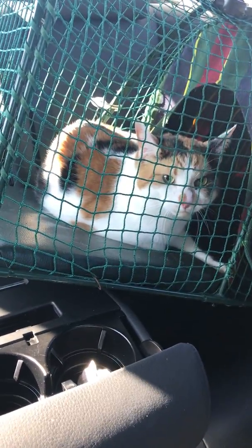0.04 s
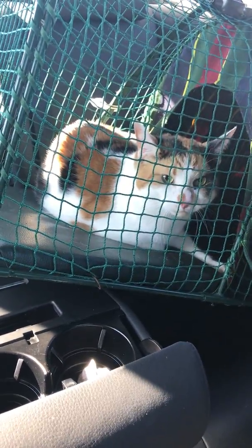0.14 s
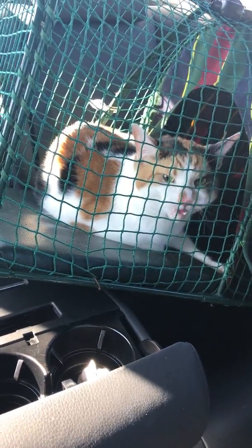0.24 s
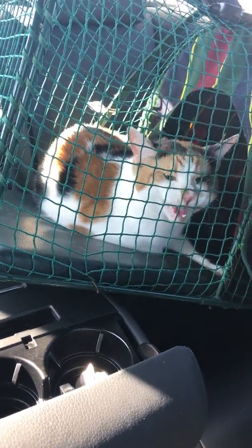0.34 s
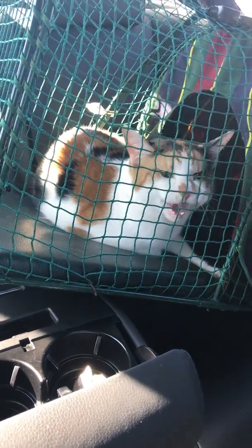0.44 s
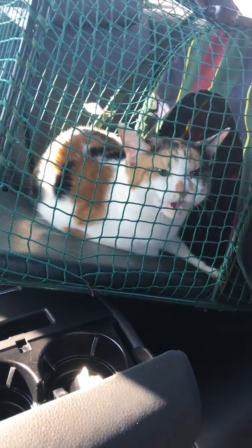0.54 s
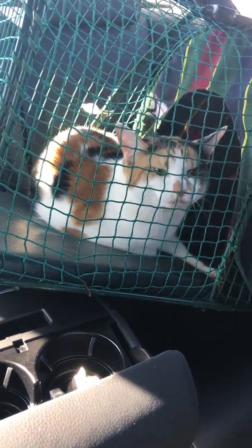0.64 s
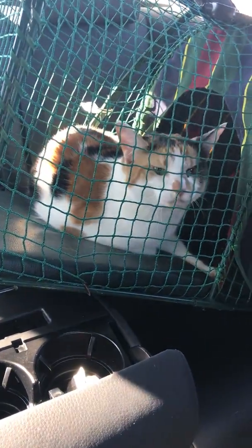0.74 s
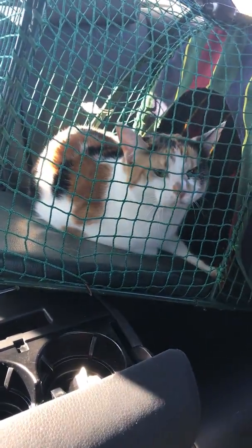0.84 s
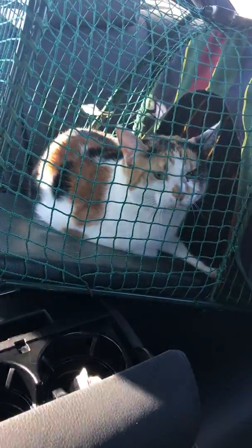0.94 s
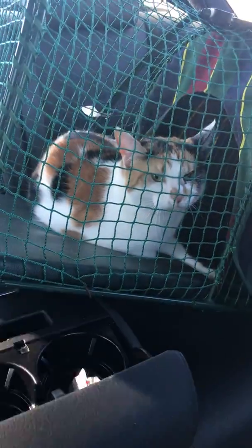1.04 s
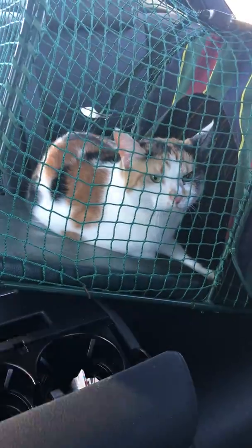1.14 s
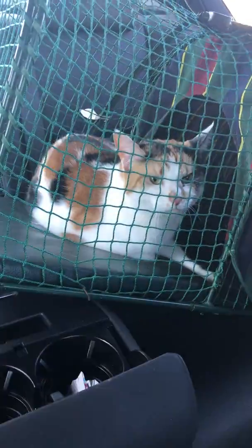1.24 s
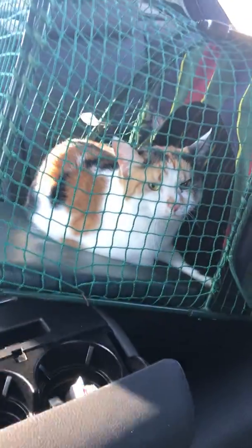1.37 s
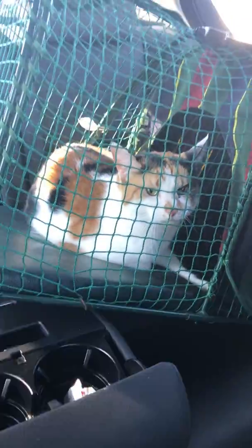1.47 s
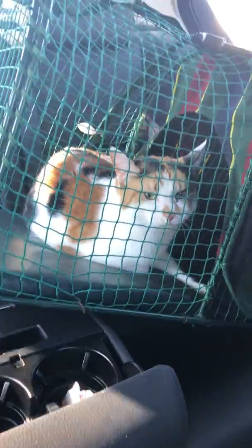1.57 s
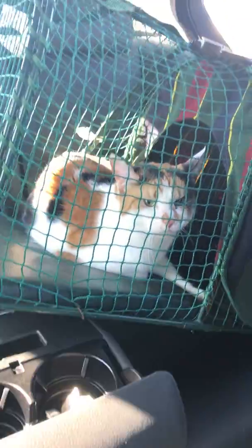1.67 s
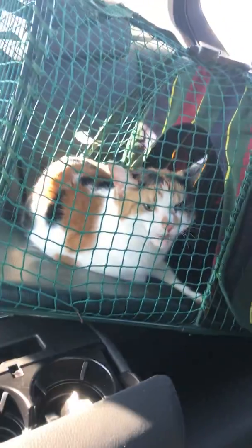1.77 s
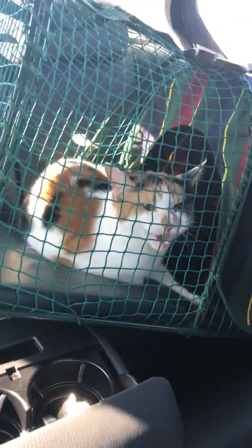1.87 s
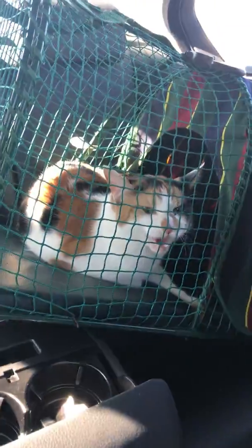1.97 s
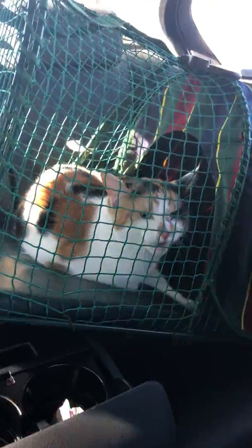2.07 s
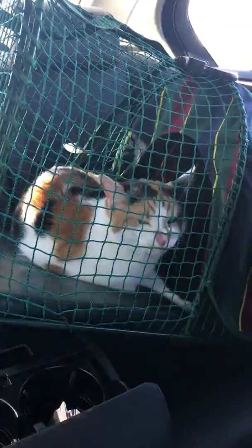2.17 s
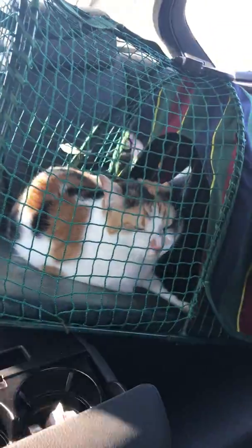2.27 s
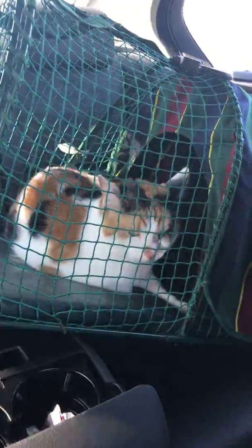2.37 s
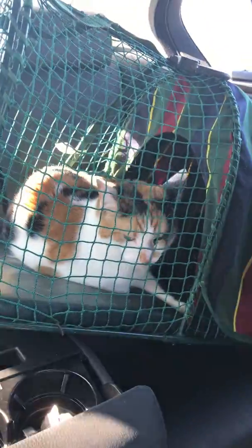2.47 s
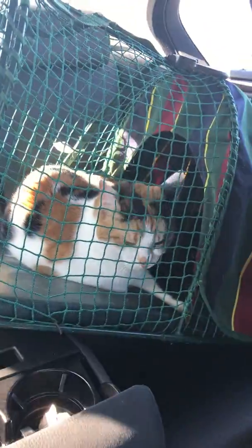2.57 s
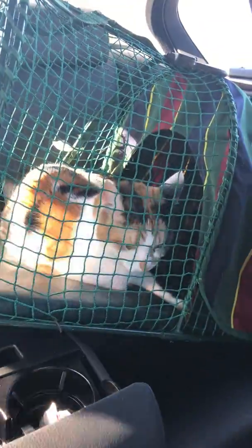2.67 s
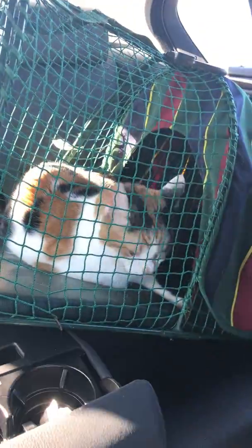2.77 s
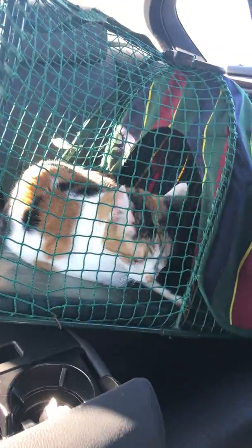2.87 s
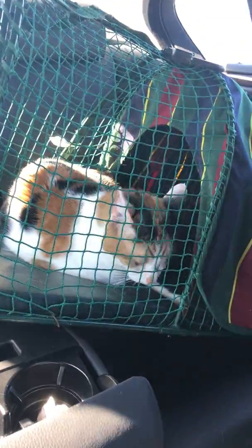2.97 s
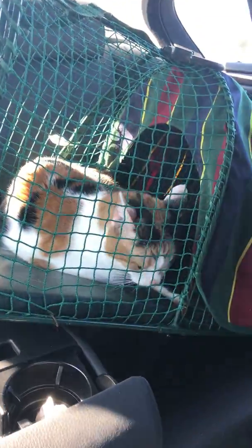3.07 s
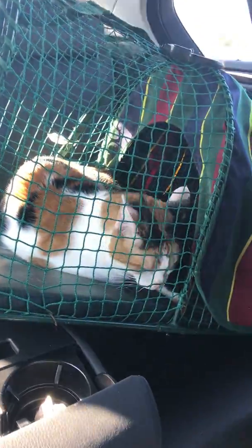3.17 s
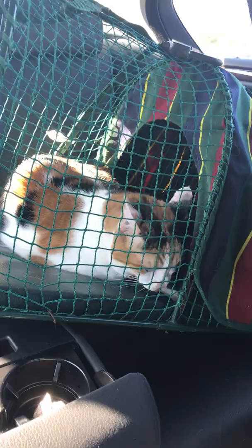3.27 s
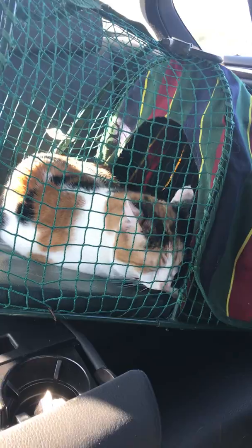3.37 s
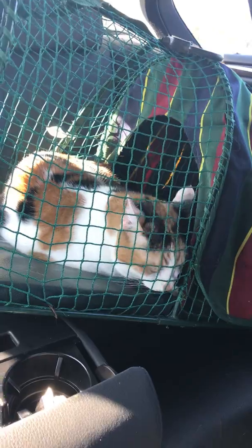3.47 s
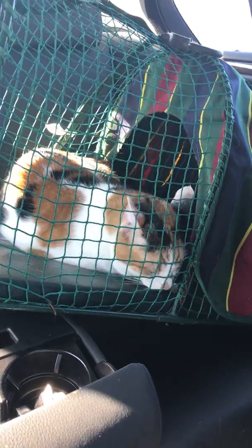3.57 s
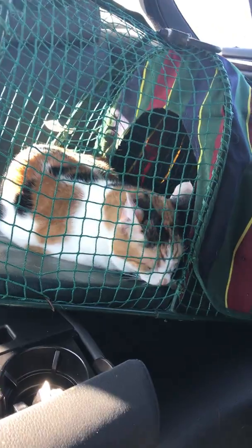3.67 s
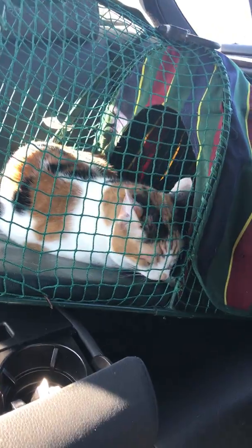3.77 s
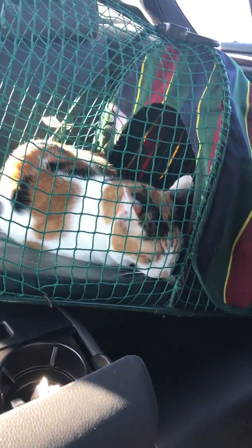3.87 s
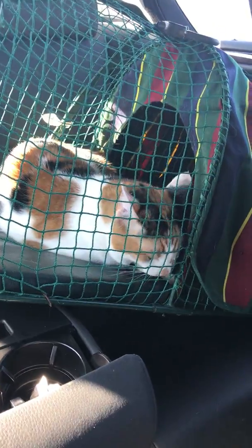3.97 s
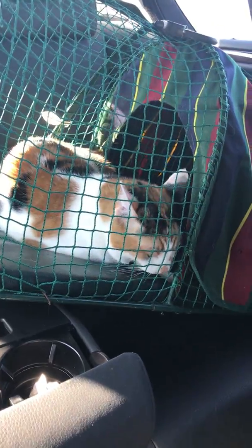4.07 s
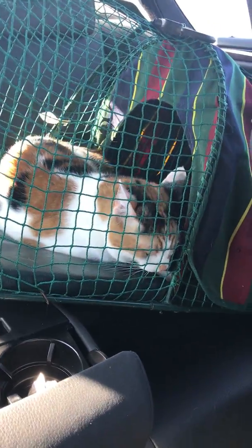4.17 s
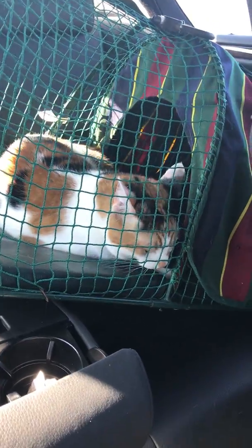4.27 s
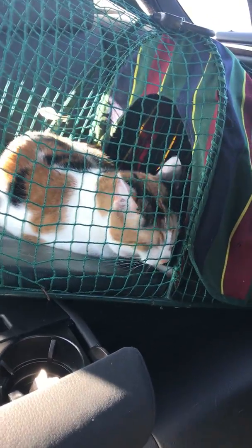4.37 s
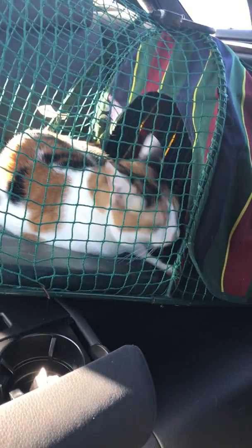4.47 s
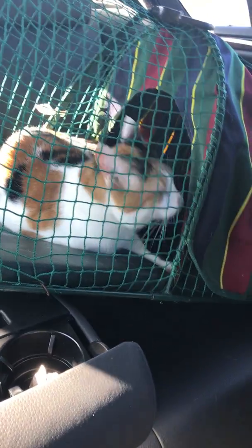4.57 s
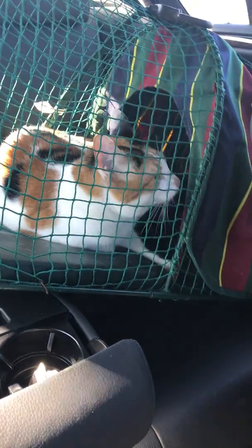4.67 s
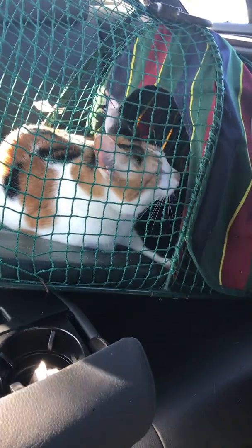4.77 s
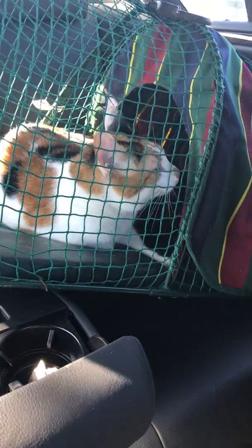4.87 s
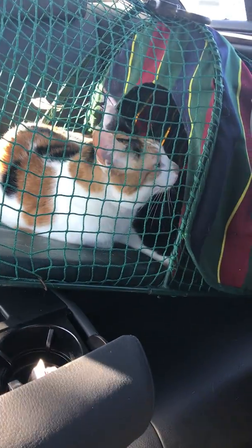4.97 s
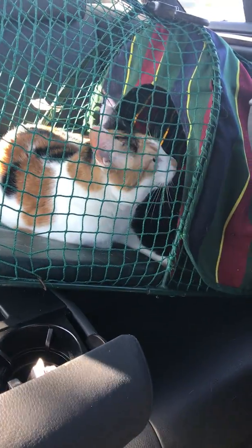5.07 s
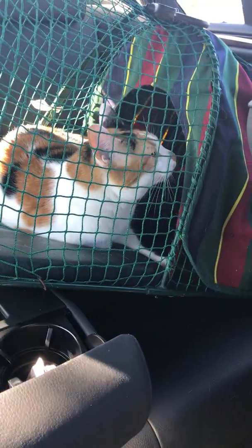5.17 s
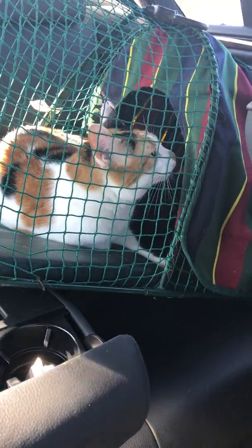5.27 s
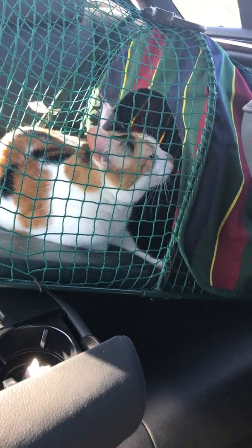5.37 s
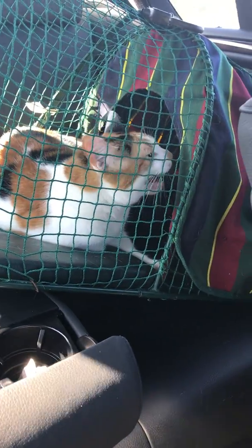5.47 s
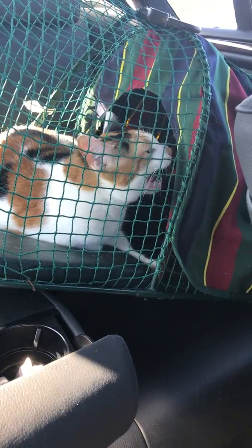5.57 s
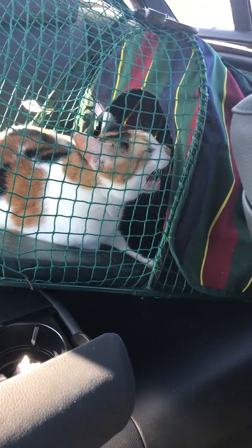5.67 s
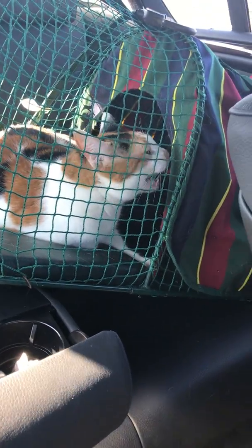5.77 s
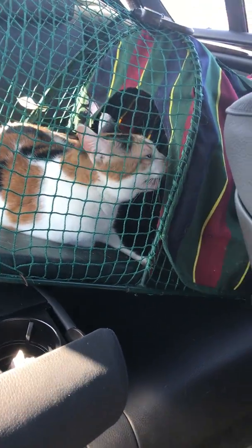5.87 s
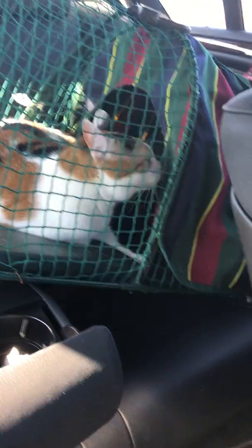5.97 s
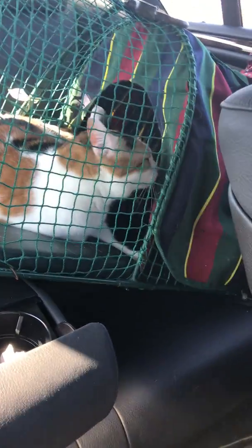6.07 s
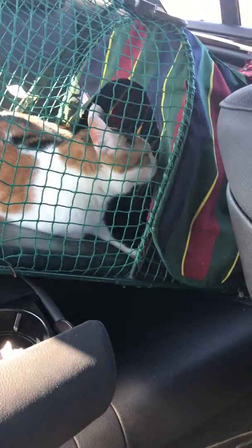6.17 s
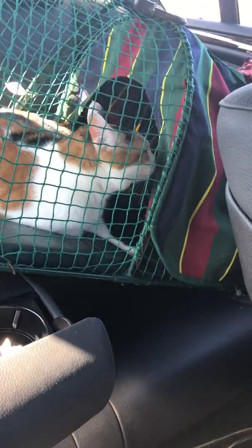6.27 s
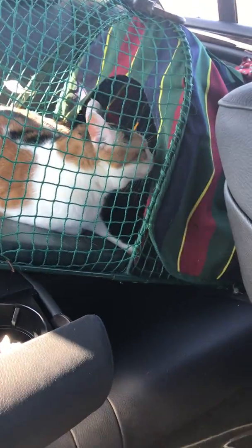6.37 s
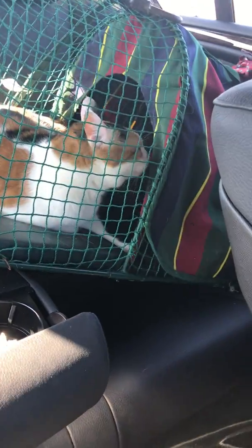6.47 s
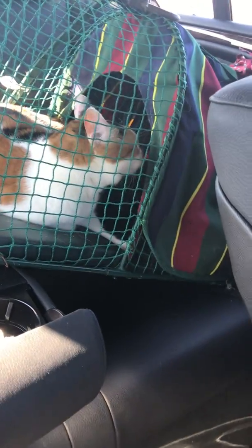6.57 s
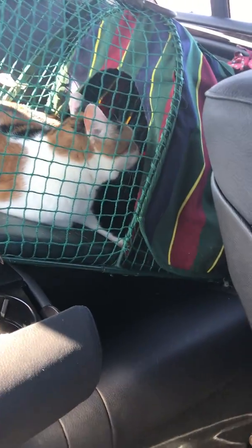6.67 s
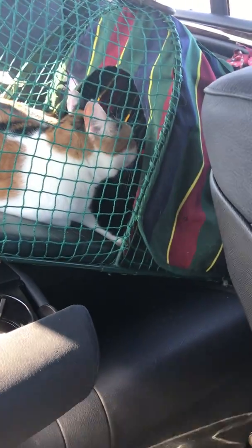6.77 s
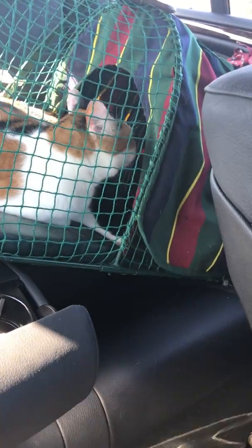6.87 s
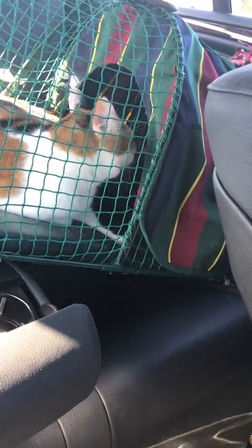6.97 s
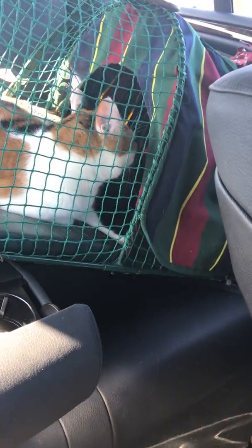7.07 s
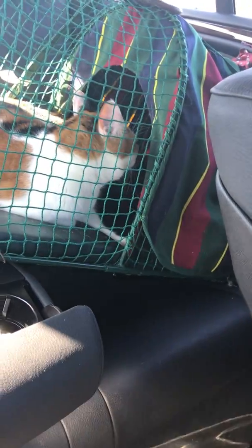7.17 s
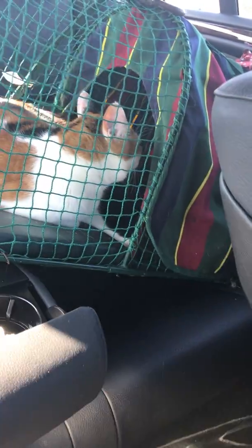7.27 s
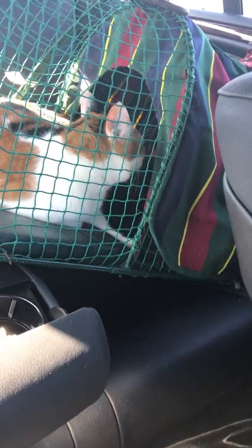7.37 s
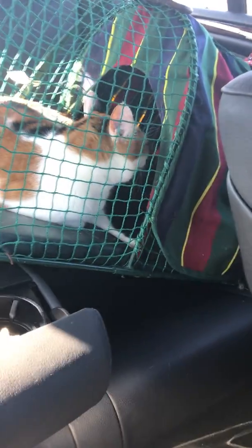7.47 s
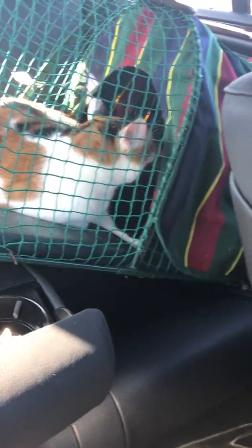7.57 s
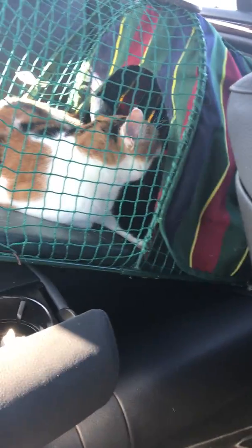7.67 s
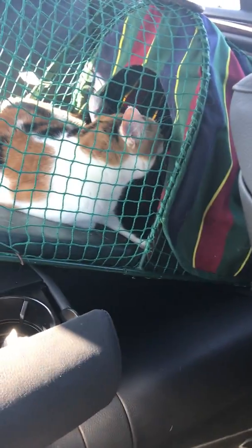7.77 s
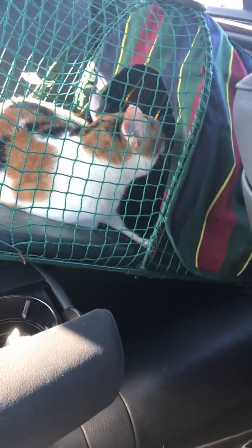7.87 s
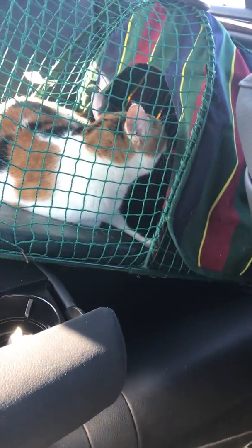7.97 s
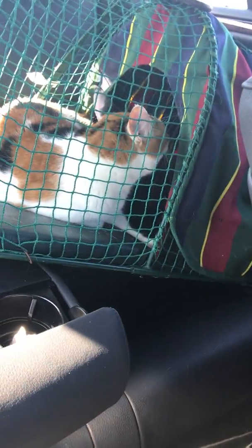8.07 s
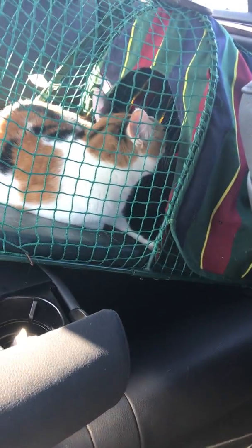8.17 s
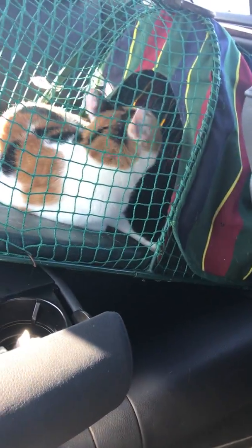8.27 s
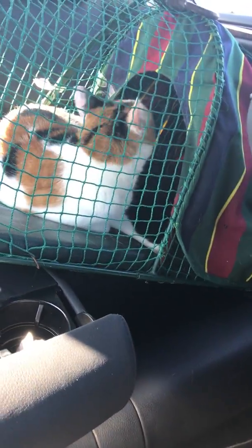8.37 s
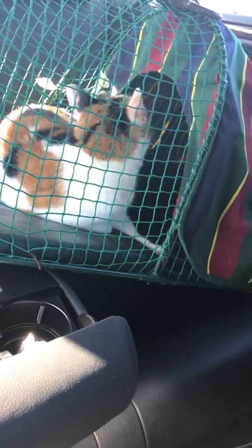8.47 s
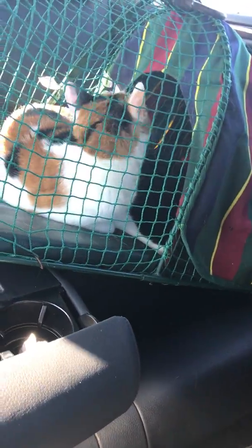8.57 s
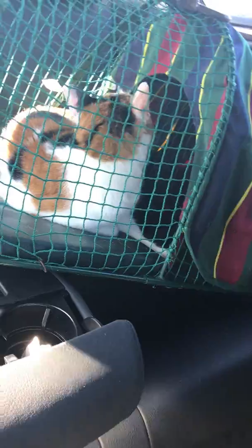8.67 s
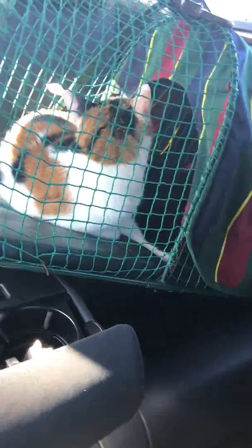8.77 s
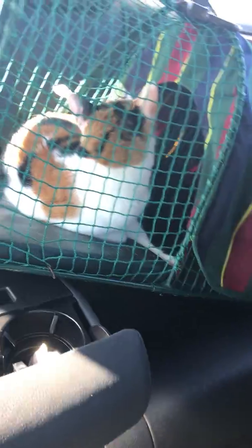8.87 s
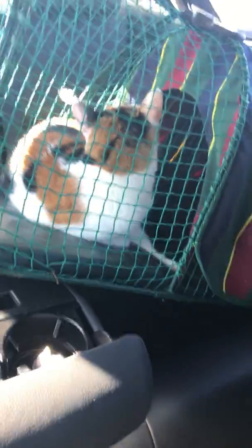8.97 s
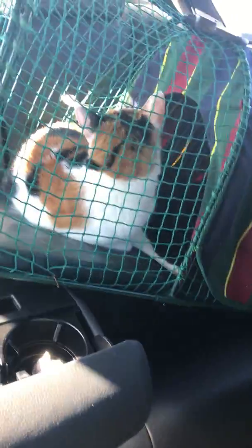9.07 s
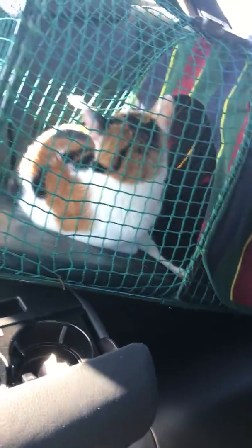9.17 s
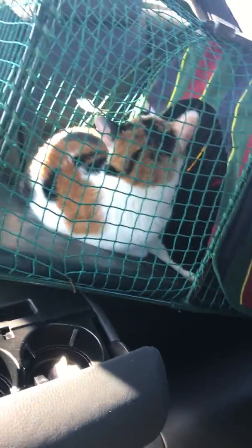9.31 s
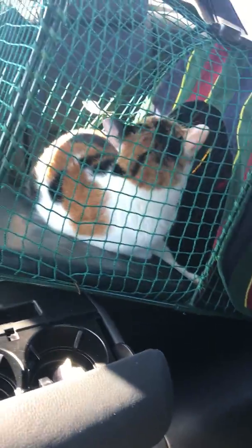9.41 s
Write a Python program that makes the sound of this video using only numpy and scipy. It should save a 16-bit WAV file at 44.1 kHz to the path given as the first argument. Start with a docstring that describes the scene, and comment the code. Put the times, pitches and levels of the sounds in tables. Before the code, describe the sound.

A cat close by meows five times, raspy at first then closing to a hum, over the steady low rumble of a moving car.

```python
"""Cat in a moving car

Inside a small padded cabin, a cat close by in a net carrier meows five times and mews briefly three times.
Each meow starts in a rasp, clears into a tone and ends as a hum: a buzz through three moving formants.
Shaped noise makes the road rumble, tyre roar and air all around, the carrier's ticks and its rustles;
decaying low tones make the road jolts, a sine the late faint whine, and a noise tail the cabin's answer."""
import sys
import numpy as np
from scipy import signal
from scipy.fft import rfft, irfft, next_fast_len
from scipy.io import wavfile
from scipy.ndimage import map_coordinates

SR = 44100
rng = np.random.default_rng(int(sys.argv[2]) if len(sys.argv) > 2 else 0)


def unload_wav(signal):
    """Save mono or channel-first audio to the path in sys.argv[1] as 16-bit WAV at rate SR, clipped to [-1, 1]."""
    wavfile.write(
        sys.argv[1],
        SR,
        np.round(np.clip(np.atleast_2d(signal).T, -1, 1) * 32767).astype(np.int16),
    )


N = 416290


def amp(db):
    """Decibels to gain."""
    return 10 ** (np.asarray(db) / 20)


def unit(x):
    """Scaled to rms 1."""
    return x / np.sqrt(np.mean(x ** 2) + 1e-20)


def along(points, hz):
    """Read (freq_hz, value) points on a log frequency axis."""
    f, v = np.transpose(points)
    return np.interp(np.log(hz + 1), np.log(f + 1), v)


def curves(rows, t):
    """Read each column after the time, at the times t."""
    s, *cols = np.transpose(rows)
    return [np.interp(t, s, c) for c in cols]


def bell(t, centre, half):
    """A smooth bump of height 1."""
    return np.exp(-((t - centre) / half) ** 2)


def wobble(rate, size):
    """A smooth random curve, rate knots a second."""
    knots = rng.standard_normal(int(size * rate / SR) + 4)
    return map_coordinates(knots, [np.arange(size) * rate / SR])


def filtered(x, response):
    """x times a response of frequency."""
    m = next_fast_len(len(x) + 8192)
    spectrum = rfft(x, m) * response(np.fft.rfftfreq(m, 1 / SR))
    return irfft(spectrum, m)[:len(x)]


def noise(spectrum, size, tilt_db=0):
    """Coloured noise of rms 1, tilted by tilt_db per octave."""
    white = rng.standard_normal(size)
    return unit(filtered(white, lambda hz: amp(along(spectrum, hz) + tilt_db * np.log2(hz + 1))))


def add(track, s, sound):
    """Mix a sound into the track at time s."""
    part = track[max(round(s * SR), 0):][:len(sound)]
    part += sound[:len(part)]


# the car on a changing road surface, before small trims: time_s, rumble_db, tyre_roar_db
ROAD = [(0, -35.5, -37), (1.6, -39, -37), (2.3, -39, -38.5), (3.9, -36.5, -37), (4.7, -38, -39.5),
        (6.3, -40.5, -39.5), (8.2, -40.5, -41), (9.44, -39, -39.5)]
# colour of the body rumble: freq_hz, relative_db_per_hz
RUMBLE_COLOUR = [(15, -22), (25, -4), (32, -5.5), (50, 1), (62, -0.5), (80, -2.5), (100, -14.5), (130, -16),
                 (280, -78)]
# colour of the tyre roar: freq_hz, relative_db_per_hz
TYRE_COLOUR = [(59, -41), (100, -2), (124, 1), (151, -4), (220, -3.5), (253, -9), (341, -14), (454, -16.5),
               (550, -26.5), (674, -24), (1070, -24), (1330, -30), (1680, -26), (1950, -34), (2600, -38.5),
               (3380, -85), (5720, -120)]
# colour of the air hiss: freq_hz, relative_db_per_hz
AIR_COLOUR = [(1290, -22.5), (2200, -5), (2770, -3), (3450, -4.5), (3810, -8), (5160, -10.5), (5650, -13),
              (7110, -15), (10500, -23.5), (12400, -20), (15600, -29)]
# faint whine of the running gear: time_s, mean_pitch_hz, level_db
GEAR_WHINE = [(8.7, 672, -96), (8.95, 664, -63), (9.44, 671, -58.5)]


def car(air_db=-64.5):
    """Body rumble, tyre roar that varies with the road surface, a soft hiss of air and a faint whine."""
    t = np.arange(N) / SR
    rumble_db, tyre_db = curves(ROAD, t)
    rumble = amp(rumble_db + 0.37) * noise(RUMBLE_COLOUR, N)
    tyres = noise(TYRE_COLOUR, N)
    boom = filtered(tyres, lambda hz: 1 / (1 + (hz / 450) ** 4))
    tread = tyres - boom
    # the boom follows the road and wavers slightly; the tread noise above it stays level
    roar = amp(tyre_db + 0.24 * wobble(4.8, N)) * boom
    roar = roar + amp(np.mean(tyre_db) + 0.1) * tread
    air = amp(air_db) * noise(AIR_COLOUR, N)
    whine_hz, whine_db = curves(GEAR_WHINE, t)
    whine_phase = 2 * np.pi * np.cumsum(whine_hz + 4 * wobble(25, N)) / SR
    whine = amp(whine_db) * unit(np.sin(whine_phase))
    return rumble + roar + air + whine


def formant(hz, centre_hz, width_hz, gain_db):
    """Power gain of one resonance of the mouth."""
    return amp(gain_db) ** 2 / (1 + (2 * (hz - centre_hz) / width_hz) ** 2)


# strength of the overtones before the mouth shapes them: freq_hz, relative_db
THROAT_COLOUR = [(650, -1.5), (1300, 0), (2000, -5), (2750, -3), (3400, -12.5), (4100, -21.5),
                 (4700, -19.5), (5500, -19.5), (7000, -23), (8000, -35.5), (9200, -27.5), (10500, -43.5),
                 (12000, -37), (15000, -40)]
# the voice strains into period doubling: centre_s, half_length_s, doubling_db
VOICE_STRAINS = [(5.745, .11, -4), (7.916, 0.078, -12.5)]
# hiss of the rasping folds through the mouth: freq_hz, relative_db_per_hz
GRIT_COLOUR = [(900, -30), (1500, -9.5), (1850, -11.5), (2300, 4.5), (2800, -2), (3200, -15), (4000, -23),
               (7000, -45), (12000, -70)]
# breath noise that makes the voice husky: freq_hz, relative_db_per_hz
HUSK = [(600, -13), (1400, -13), (2600, 1.0), (3800, -4.0), (5500, -10), (7000, -7.0), (9000, -18.0),
        (14000, -29.5)]
GRIT_DB = 7.5  # at full rasp, against the voice
SECOND_WIDTH_HZ, RASP_WIDTH_HZ = 119, 70  # the second formant broadens by up to the latter in a rasp
# alternate cycles differ a little in a clear voice and more in a rasp
CLEAR_DOUBLING_DB, RASP_DOUBLING_DB = -40.5, -13.5


def voice(t, pitch, voice_db, formants_hz, ring_db, third_db, muffle_db, rasp, colouring, jitter=0.004,
          rasp_jitter=0.024, rasp_depth=0.37, shimmer_db=0.9, flutter_db=0.7464, husk_db=-14.0,
          edge=0.024):
    """The vocal folds buzz through three moving formants and the lips."""
    n = len(t)
    first_hz, second_hz, third_hz = formants_hz
    chest_db, treble_db, top_db = colouring
    strain = sum(amp(db) * bell(t, s, half) for s, half, db in VOICE_STRAINS)
    doubling = amp(CLEAR_DOUBLING_DB) + amp(RASP_DOUBLING_DB) * rasp + strain
    uneven = 1 + jitter * wobble(70.4, n) + rasp_jitter * rasp * wobble(220, n)
    phase = 2 * np.pi * np.cumsum(pitch * uneven) / SR
    second_width_hz = SECOND_WIDTH_HZ + RASP_WIDTH_HZ * rasp
    tone = np.zeros(n)
    # unequal alternate cycles put lines halfway between the harmonics, so k steps by a half
    for k in np.arange(2, 48) / 2:
        hz = k * pitch
        mouth = 0.5 + formant(hz, first_hz, width_hz=51, gain_db=ring_db)
        mouth = mouth + formant(hz, second_hz, width_hz=second_width_hz, gain_db=28.0)
        mouth = mouth + formant(hz, third_hz, width_hz=170, gain_db=third_db)
        lips_db = -muffle_db * np.clip(np.log2(hz / 650), 0, 2)
        colouring_db = along([(2850, 0.0039), (3550, treble_db), (4700, top_db)], hz)
        if k == 1:
            colouring_db = chest_db
        halfway = doubling if k % 1 else 1
        # high overtones are the least steady
        waver_db = flutter_db * (min(k, 8) - 1) * wobble(20, n)
        overtone_db = along(THROAT_COLOUR, hz) + lips_db + colouring_db + waver_db
        size = halfway * np.sqrt(2 * mouth) * amp(overtone_db)
        tone += size * np.sin(k * phase + rng.uniform(0, 2 * np.pi))
    # turbulence at the folds, one puff a cycle, makes the open-mouthed tone husky and the rasp gritty
    husk = noise(HUSK, n) * amp(1.5 * wobble(60, n))
    breath = amp(husk_db + top_db - 2 * muffle_db) * husk
    grit = amp(GRIT_DB) * rasp ** 2 * noise(GRIT_COLOUR, n)
    tone += (breath + grit) * (1 + np.cos(phase))
    fade = np.clip(np.minimum(t - t[0], t[-1] - t) / edge, 0, 1)
    level = amp(voice_db + shimmer_db * wobble(118.2, n))
    return tone * fade * level * (1 + rasp_depth * rasp * wobble(110, n))


RING_DB = 17.5  # the first formant with the mouth open
# the rasp builds and clears within these times (s), down to a trace (0-1)
BUILD_S, CLEAR_S, TRACE_RASP = 0.02, 0.02, 0.036
# as the lips shut the pitch dips (share) and the pout rings (s); muffling sets in early (closing times)
LIP_DIP, POUT_S, LIPS_LEAD = 0.0603, 0.038, 0.52
THIRD_DB, NOSE_DB = 11.5, 14  # the third formant, and what the nose adds to it in the hum
HUM_MUFFLE_DB_PER_S = 28.5  # the hum grows duller (dB per octave per s)


def meow(curve, shut_s, closing_s, pout_db, third_start_hz, third_shut_hz, start_db, open_db, shut_db,
         chest_db, treble_db, top_db, rasp, rasp_s, jaw_rise=0.4, jaw_time=0.018):
    """A rasp clears into a tone as the mouth opens, until the lips shut, dip the pitch and leave a hum."""
    start = curve[0][0]
    t = np.arange(start, curve[-1][0], 1 / SR)
    pitch, voice_db, first_hz, second_hz = curves(curve, t)
    progress = np.clip((t - start) / (shut_s - start), 0, 1)
    shut = (1 + np.tanh((t - shut_s) / closing_s + LIPS_LEAD)) / 2
    pitch = pitch * (1 - LIP_DIP * bell(t, shut_s, closing_s))
    # as the jaw drops, the second formant glides up into place
    second_hz = second_hz * (1 - jaw_rise * bell(t, start, jaw_time))
    third_hz = third_start_hz + (third_shut_hz - third_start_hz) * progress
    # nearly closed lips lose little sound, so the first formant rings hardest as they shut
    ring_db = RING_DB + pout_db * bell(t, shut_s, POUT_S)
    opening_db = start_db + (open_db - start_db) * progress
    muffle_db = opening_db * (1 - shut) + shut_db * shut
    muffle_db = muffle_db + HUM_MUFFLE_DB_PER_S * np.maximum(t - shut_s, 0)
    building = 1 - bell(t, start, BUILD_S)
    clearing = (1 - np.tanh((t - start - rasp_s) / CLEAR_S)) / 2
    roughness = TRACE_RASP + rasp * building * clearing
    return voice(t, pitch, voice_db, (first_hz, second_hz, third_hz), ring_db,
                 THIRD_DB + NOSE_DB * shut, muffle_db, roughness, (chest_db, treble_db, top_db))


# their upper formants and how far their level falls at either end
MEW_SECOND_HZ, MEW_THIRD_HZ, MEW_ARCH_DB = 2490, 3750, 2


def mew(s, length, start_hz, end_hz, db, first_start_hz, first_end_hz, muffle_db, chest_db, rasp,
        ring_db=26.0):
    """A whimper or a croak: one short glide that swells and fades."""
    t = np.arange(s, s + length, 1 / SR)
    progress = (t - s) / length
    pitch = start_hz + (end_hz - start_hz) * progress
    first_hz = first_start_hz + (first_end_hz - first_start_hz) * progress
    voice_db = db - MEW_ARCH_DB * (2 * progress - 1) ** 2
    return voice(t, pitch, voice_db, (first_hz, MEW_SECOND_HZ, MEW_THIRD_HZ), ring_db, THIRD_DB,
                 muffle_db, rasp, (chest_db, 0, 0))


# one curve a meow, before mouth and distance:
# time_s, pitch_hz, relative_voice_db, first_formant_hz, second_formant_hz
MEOW_1 = [(0.297, 474.6, -59.5, 1520, 2110), (0.365, 580, -54.5, 1382, 2590), (0.435, 729, -43, 1680, 2677),
          (0.528, 693.6, -44.5, 1460, 2478), (0.615, 682.2, -44, 1415, 2310),
          (0.733, 661.4, -46.5, 1258, 2470), (0.871, 642.6, -44, 1390, 1926),
          (1.023, 609, -46.5, 1190, 2117), (1.101, 546, -61.2, 1103, 2174)]
MEOW_2 = [(1.81, 472, -64, 1470, 2650), (1.896, 592, -54, 1528, 2660), (1.943, 678, -52, 1370, 2730),
          (2.028, 686, -48, 1398, 2400), (2.111, 664.6, -47, 1373, 2228), (2.211, 651.7, -53.5, 1205, 2130),
          (2.322, 640.6, -48, 1345, 2125), (2.419, 637, -46.5, 1330, 2269), (2.499, 579, -62, 1288, 2228)]
MEOW_3 = [(3.865, 550, -60.5, 1508, 1750), (3.912, 656, -51.5, 1580, 2530), (3.984, 721, -54.5, 1709, 2430),
          (4.05, 724, -51.5, 1680, 2620), (4.097, 694, -50, 1430, 2400), (4.202, 684.5, -48, 1420, 2500),
          (4.293, 657, -55, 1270, 2043), (4.332, 640, -55, 1234, 2117), (4.418, 592, -57, 1193, 2270)]
MEOW_4 = [(5.597, 697, -59, 1275, 2570), (5.685, 781, -55.4, 1160, 2460), (5.728, 774, -53.5, 1211, 2458),
          (5.801, 727, -52.5, 1240, 2610), (5.83, 715, -54.5, 1350, 2166),
          (5.953, 676.4, -54.5, 1380, 2215), (6.012, 667.7, -59, 1315, 2376),
          (6.059, 640, -67.5, 1214, 2030), (6.146, 575, -69.5, 1153, 2030)]
MEOW_5 = [(7.674, 613, -65.5, 1448, 2040), (7.74, 658.5, -56, 1382, 2142), (7.847, 653, -49, 1570, 1937),
          (7.968, 661, -53, 1310, 2063), (8.03, 653.7, -52, 1209, 2130), (8.107, 650.6, -55.2, 1200, 2170),
          (8.156, 657, -62, 1227, 2020), (8.236, 620, -56, 1240, 2030), (8.305, 590, -65.5, 1180, 1870)]
# the mouth opens and shuts once in each meow; the fundamental's strength varies from meow to meow, and the turn
# of the head colours the treble: # curve, lips_shut_s, closing_s, pout_ring_db, third_formant_start_hz,
# third_formant_shut_hz, # muffling at the start, open and shut (start_, open_, shut_db_per_octave, over
# 650-2600 Hz), # fundamental_db, treble_db, top_db, opening_rasp (0-1), rasp_length_s
MEOW_MOUTHS = [(MEOW_1, 0.7344, 0.0066, 11.7, 3360, 4569, 5.8, 1.56, 13.7, -0.72, 3.5, .5, .85, .078),
               (MEOW_2, 2.232, 0.0071, 14, 3396, 4641, 6.7, -0.27, 16, 1, -3.1, 1.3, .9, .11),
               (MEOW_3, 4.313, 0.0158, 12.4, 3406, 4050, 3.2, 5.2, 12.4, -0.93, 10.4, -0.73, .33, .22),
               (MEOW_4, 6.058, .0098, 16.7, 3450, 5650, .3, -5, 5.1, 6, 2.4, -1.5, .7, .06),
               (MEOW_5, 8.165, .037, 20.3, 3957, 4000, 2.4, -2, 5.7, -7, -7, -4, .3, 0.067)]
# short calls through a barely open mouth: start_s, length_s, start_pitch_hz, end_pitch_hz,
# relative_voice_db, first_formant_start_hz, first_formant_end_hz, muffling_db_per_octave,
# fundamental_db, rasp (0-1)
SHORT_CALLS = [(2.584, 0.215, 558, 526, -57.5, 1420, 1020, 18, -1, .03),
               (5.511, 0.062, 516, 630, -62.5, 1465, 1460, 6, 0, 0.83),
               (7.582, .068, 506, 565, -63.5, 1470, 1480, 8, -10, .75)]


def cat():
    """All the cat's calls, long and short, sung by the same vocal folds."""
    track = np.zeros(N)
    for curve, *mouth in MEOW_MOUTHS:
        add(track, curve[0][0], meow(curve, *mouth))
    for s, *shape in SHORT_CALLS:
        add(track, s, mew(s, *shape))
    return track


# how long the cabin rings: freq_hz, t60_s
CABIN_DECAY = [(300, 0.045), (2000, 0.2), (10000, 0.019)]


def cabin(x, delay=0.002999):
    """The short answer of windows and seats: a noise tail whose decay time depends on frequency."""
    hz, t, z = signal.stft(rng.standard_normal(SR // 4), SR, nperseg=256)
    decay = amp(-60 * t / along(CABIN_DECAY, hz)[:, None])
    tail = signal.istft(z * decay, SR, nperseg=256)[1]
    late = np.pad(x, (round(delay * SR), 0))
    return signal.fftconvolve(late, tail / np.linalg.norm(tail))[:N]


# ticks of the carrier's fittings: start_s, onset_level_db, brightness_db_per_octave
FITTING_TICKS = [(1.164, -64.5, 6), (2.394, -62, 9), (5.095, -64.5, 8), (5.4377, -35, -2), (9.386, -42, -4)]
# colour of the fittings before brightness: freq_hz, relative_db_per_hz
FITTING_COLOUR = [(300, -6), (800, -1), (1800, 2), (2600, -5), (4100, -1.5), (5200, -12), (8000, -14.5),
                  (10500, -20), (13000, -14), (15500, -23.5)]
# the cat shifts on the fabric: centre_s, mean_peak_level_db, half_length_s
FABRIC_RUSTLES = [(3.146, -70, 0.14), (6.246, -70, 0.094), (6.549, -65.5, 0.082), (9.398, -62.5, 0.049)]
# colour of the fabric: freq_hz, relative_db_per_hz
FABRIC_COLOUR = [(800, -18), (2500, 3.5), (6500, -7.5), (10000, -7.5), (15000, -10)]


def carrier(t60=0.06, stir_db=3):
    """Dry ticks of the fittings as decaying noise, and soft rustles of the fabric as uneven swells."""
    track, t = np.zeros(N), np.arange(SR // 8) / SR
    for s, db, bright_db in FITTING_TICKS:
        add(track, s, amp(db - 60 * t / t60) * noise(FITTING_COLOUR, len(t), bright_db))
    now = np.arange(N) / SR
    strokes = sum(amp(db) * bell(now, s, half) for s, db, half in FABRIC_RUSTLES)
    rustle = strokes * amp(stir_db * wobble(150, N)) * noise(FABRIC_COLOUR, N)
    return track + rustle


# road jolts: envelope_peak_s, envelope_peak_db, boom_hz
ROAD_JOLTS = [(2.861, -35, 216), (2.942, -31, 112), (2.949, -36.5, 216.7), (3.548, -39, 49),
              (5.564, -36, 124)]


def jolts(rise=0.02086):
    """Bumps in the road set the cabin booming: low sines that rise quickly and die away."""
    track, t = np.zeros(N), np.arange(SR // 4) / SR
    envelope = t / rise * np.exp(1 - t / rise)
    for s, db, hz in ROAD_JOLTS:
        add(track, s - rise, amp(db) * envelope * np.sin(2 * np.pi * hz * t))
    return track


def scene():
    """The cat and its carrier close by, answered by the cabin, the car all around."""
    near = amp(2.4) * cat() + carrier()
    answer = amp(-14) * cabin(near)
    return (near + answer + car() + jolts())[None]


TOP_HZ = 15780


def record(dry):
    """The phone microphone keeps nothing above its band limit."""
    return np.array([filtered(channel, lambda hz: hz < TOP_HZ) for channel in dry])


dry = scene()
out = record(dry)
unload_wav(out)
```